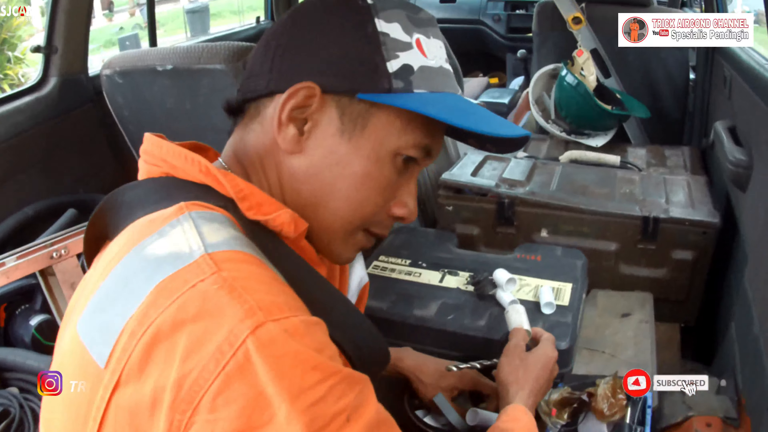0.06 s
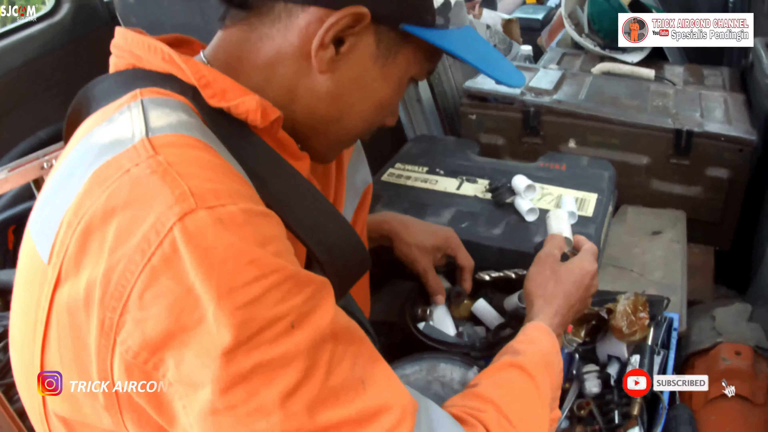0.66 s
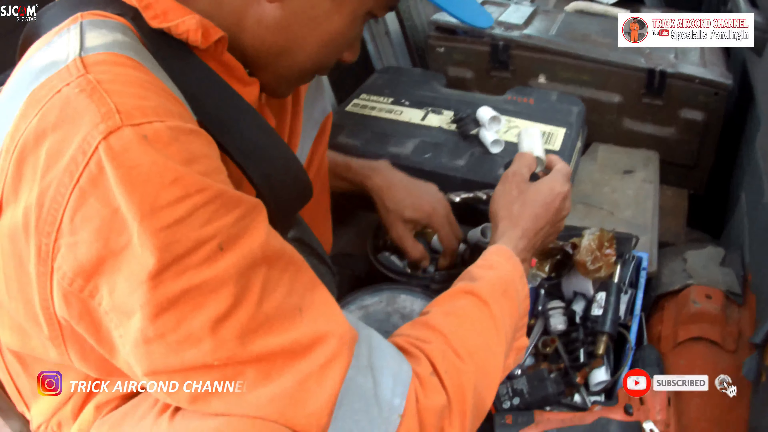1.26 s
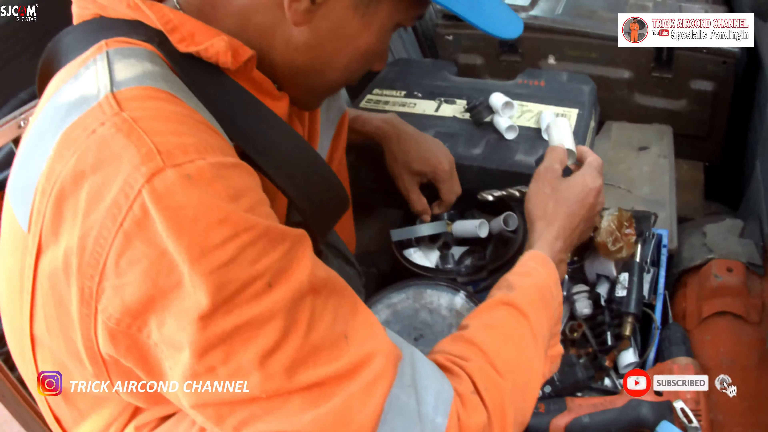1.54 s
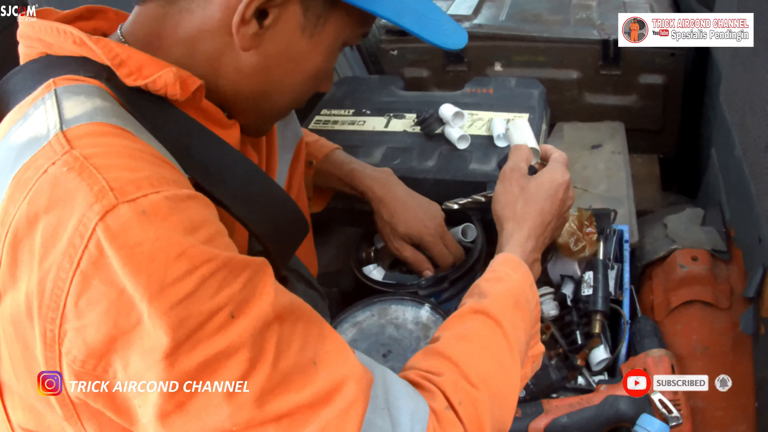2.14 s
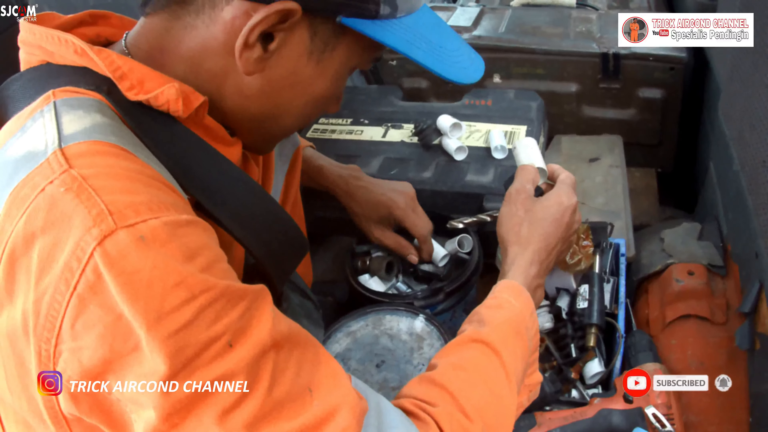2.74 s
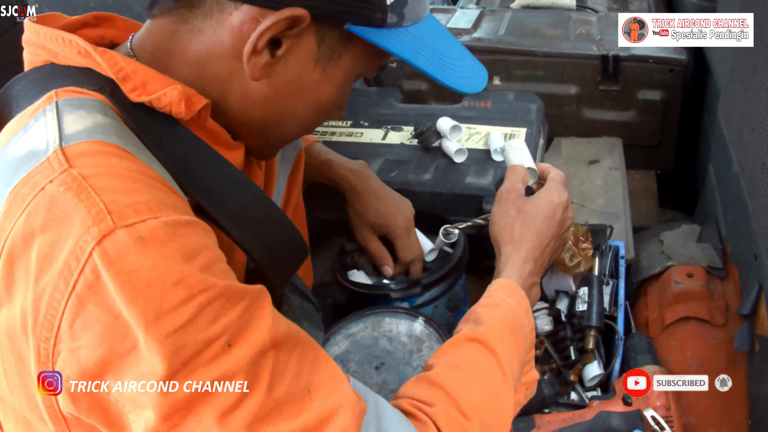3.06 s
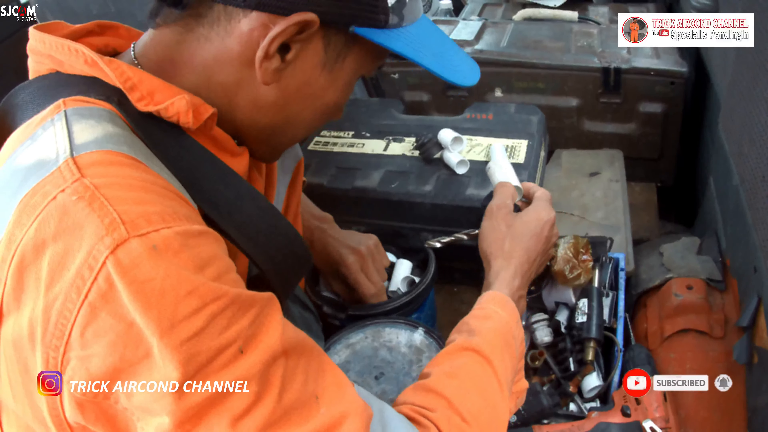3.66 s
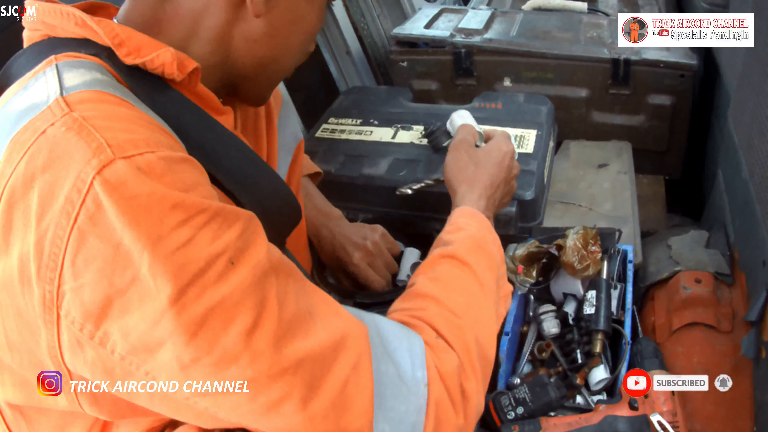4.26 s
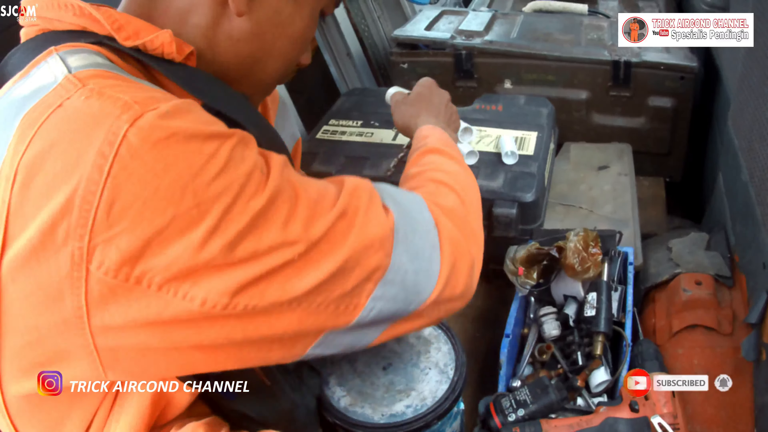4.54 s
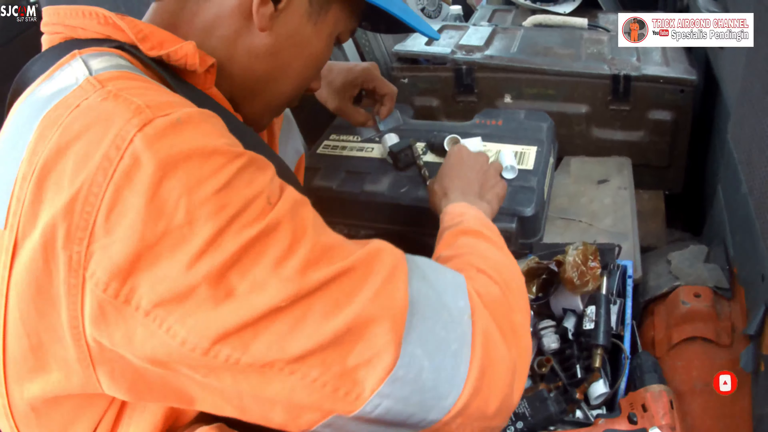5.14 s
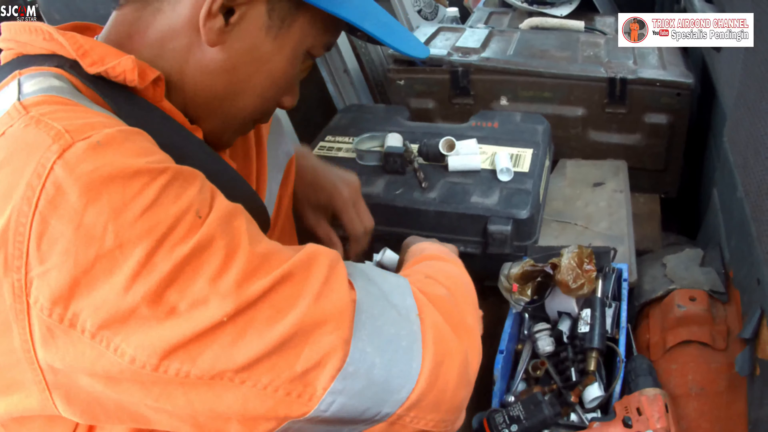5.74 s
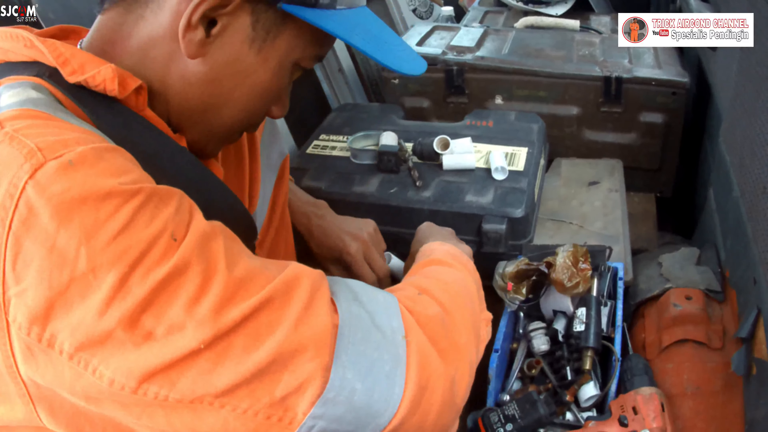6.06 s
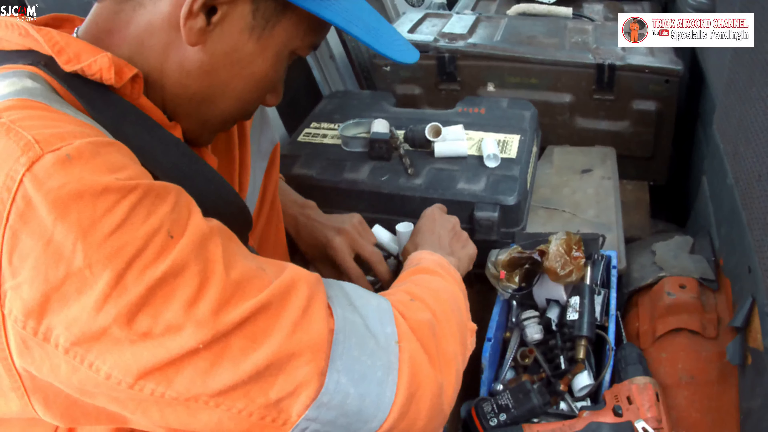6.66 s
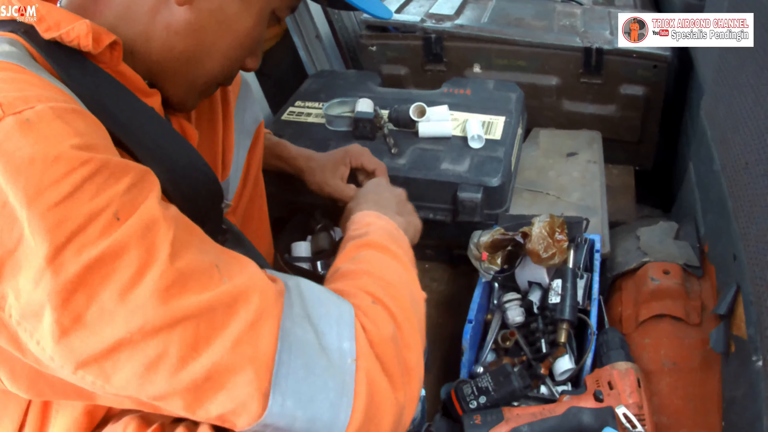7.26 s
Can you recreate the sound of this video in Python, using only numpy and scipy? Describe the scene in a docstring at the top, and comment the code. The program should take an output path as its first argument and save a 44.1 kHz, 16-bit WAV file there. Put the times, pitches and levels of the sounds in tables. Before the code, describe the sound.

Inside a cramped van, a hand stirs a tub of small metal and plastic parts. They slide, clack and knock against the tub in uneven bursts, with faint clinks from a steel drill bit. Past the middle, a few parts land on a hollow plastic tool case with louder, booming knocks, then lighter rummaging resumes. A steady low rumble runs underneath, and everything is heard from close by.

```python
"""Rummaging for spare parts in a van

A hand stirs a tub of small metal and plastic parts in the back of a van, over a steady low rumble.
Parts slide, clack and knock on the tub, and a steel drill bit clinks among them. Midway a few are
put down on a hollow plastic tool case, which booms. The cramped cab answers briefly."""
import sys
import numpy as np
from scipy import signal
from scipy.fft import rfft, irfft, next_fast_len
from scipy.io import wavfile

SR = 44100
rng = np.random.default_rng(int(sys.argv[2]) if len(sys.argv) > 2 else 0)


def inscribe(sig):
    """Save sig as 16-bit PCM at rate SR to the path in sys.argv[1].

    A 1-D sig is mono; a 2-D sig holds one channel per row.
    Samples are clipped to [-1, 1] before scaling.
    """
    pcm = np.round(np.clip(np.atleast_2d(sig).T, -1, 1) * 32767)
    wavfile.write(sys.argv[1], SR, pcm.astype(np.int16))


N = 326781
AGE = np.arange(12288) / SR  # seconds since a hit
HZ = np.fft.rfftfreq(len(AGE), 1 / SR)

# Sweeps of the hand. Each row: start and end in seconds, effort as the rubbing level in dB.
HAND_STROKES = [(0.29, 0.629, -35), (0.994, 1.059, -32.5), (1.153, 1.246, -35.5), (1.221, 1.354, -30.5),
                (1.42, 1.68, -36.5), (2.206, 2.443, -30), (2.896, 3.072, -37), (3.139, 3.537, -42.5),
                (3.747, 4.242, -42.5), (4.267, 4.549, -39), (5.434, 5.811, -46), (6.035, 6.407, -48),
                (6.558, 6.76, -42.5)]
# The tub's dull knock. Each row: resonance in Hz, width in Hz, relative level in dB.
TUB_MODES = [(154.7, 21, -0.5), (209.5, 45, -4), (349.2, 51.7, 2), (689, 112, -7), (1014, 169, -11)]
# A hollow plastic fitting. Each row: resonance in Hz, width in Hz, relative level in dB.
FITTING_MODES = [(1217, 86, -5), (1560, 91, 0), (1804, 600, -12.5)]


def rummaging():
    """The foreground clatter of parts striking each other in the tub."""
    # Each row: start in seconds, strength in dB, clack pitch in Hz, hardness (treble share) in dB.
    collisions = [(0.003, -27.5, 2400, -21.5), (0.06, -30.5, 2400, -8.5), (0.331, -28, 4240, -15.5),
                  (0.427, -45.5, 4140, 0), (0.582, -35, 3260, -18.5), (0.618, -31.5, 3100.0, -12.5),
                  (0.719, -37.5, 3050, -9.5), (0.765, -35, 3850.0, -13.5), (1.006, -29, 2340.0, -11.5),
                  (1.075, -34, 3380, -16.5), (1.24, -21.5, 4320, -10), (1.253, -22.5, 3140.0, -10),
                  (1.293, -23.5, 2500, -11.5), (1.347, -29.5, 2940, -8.5), (1.4, -27, 3850, -9.5),
                  (1.433, -32.5, 3640, -3), (1.584, -24.5, 4270, -10.5), (1.656, -32.5, 3140, -7.5),
                  (1.727, -30.5, 2790, -13), (2.065, -27.5, 2560, -15.5), (2.129, -35, 2200, -24),
                  (2.208, -28, 3130, -15.5), (2.252, -33, 3000, -8), (2.286, -28, 3020, -9.5),
                  (2.429, -31.5, 2230, -20), (2.587, -39, 2520, -2.5), (2.703, -27.5, 2590, -9),
                  (2.954, -50, 3050.0, -20), (3.298, -39.5, 3090.0, -16.5), (3.359, -34.5, 2230, -13),
                  (3.384, -24.5, 3100.0, -12), (3.758, -39.5, 2900, -13.5), (4.146, -30.5, 2600, -12),
                  (4.291, -34.5, 3020, -19.5), (4.336, -27, 2260.0, -22), (4.378, -30.5, 3100, -5),
                  (4.48, -29.5, 2590, -17), (4.523, -34.5, 2670.0, -4), (5.63, -34, 2280.0, -24.5),
                  (5.748, -47.5, 2560.0, -44), (5.885, -36, 3580, -12), (5.905, -36, 4300, -4.5),
                  (6.116, -34.5, 3620.0, -26), (6.212, -52, 3030, 2.5), (6.271, -34, 2760, -15.5),
                  (6.348, -33, 2960, -17), (6.36, -34.5, 3000, -9), (6.682, -24, 2420, -18),
                  (6.727, -41.5, 2670, -7), (6.88, -39, 2500, -10.5), (7.16, -34.5, 2630, -3.5)]
    return contacts(collisions)


def contacts(rows):
    """Parts clack and rebound once; hollow ones ring lower, and the heap passes each blow to the tub."""
    # The mix of a contact. Each voice: offset in dB, dB gained per dB of extra hardness.
    balance = {"tub": (-0.58, -0.37), "hollow": (-7, 0.28), "clack": (-13, 1), "tick": (-18, 1.23)}
    # The hand meets steel at first, then mostly plastic.
    # Each row: time in seconds, tilt from plastic clack toward metal tick in dB.
    metal_tilt = [(0.05, -1.5), (0.35, 11), (1.0, 10.5), (1.75, -2), (2.55, 14.5), (2.7, -3.5), (7.4, -1)]
    attack = 1 - np.exp(-AGE / 0.00047)  # softens the first half millisecond of each hit
    impulse = AGE == 0  # the part's weight, landing at once
    half = len(AGE) // 2
    out = np.zeros(N)
    for s, strength_db, clack_hz, hardness_db in rows:
        gain = voice_gains(balance, strength_db, hardness_db)
        metal = amp(np.interp(s, *np.transpose(metal_tilt)) / 2)
        force = attack * chatter(t60=0.094, cab_db=-16.5, cab_t60=0.48)
        size = np.exp(0.14 * rng.standard_normal())
        tub = body(force + 3.3 * impulse, TUB_MODES, low_hz=118, high_hz=1330)
        fitting = body(force + 6.9 * impulse, FITTING_MODES, low_hz=815, high_hz=2340, size=size)
        hit = gain["tub"] * tub + gain["hollow"] * fitting
        hit += gain["clack"] / metal * attack * clack(clack_hz)
        hit[:half] += gain["tick"] * metal * attack[:half] * tick(mode_count=10)
        add(out, s, hit)
        rebound_s = s + 0.012 + 0.025 * rng.random()
        add(out, rebound_s, amp(-23.5) * hit)
    return out


def clack(hz):
    """A short hard part: a main mode and a weaker, higher one, over a dry crack."""
    force = chatter(t60=0.099, cab_db=-16, cab_t60=0.096) + 6.7 * (AGE == 0)
    overtone_hz = hz * rng.uniform(1.0, 1.5)
    ring = body(force, [(hz, 130, 0), (overtone_hz, 300, -12)], low_hz=1700, high_hz=5600)
    crack_force = chatter(t60=0.059, cab_db=-2, cab_t60=0.19)
    crack = body(crack_force, [(2520, 960, 0)], low_hz=1680, high_hz=5200)
    return unit_hit(ring + amp(-3.5) * crack)


def tick(mode_count):
    """Each small metal part has its own high modes, which ring over the crack of contact."""
    t = AGE[:len(AGE) // 2]
    detune = 1 + 0.04 * rng.standard_normal((mode_count, 1))
    hz = np.geomspace(4900, 14000, mode_count)[:, None] * detune
    strength, life = rng.standard_normal((2, mode_count, 1))
    t60 = 0.06 * np.exp(0.3 * life)
    ring = np.sum(amp(5 * strength - 60 * t / t60) * np.sin(2 * np.pi * hz * t), axis=0)
    force = chatter(t60=0.072, cab_db=-8, cab_t60=0.33)[:len(t)]
    crack = band(force, 2800, 11400, order=2)
    return unit_hit(unit_hit(crack) + amp(2) * unit_hit(ring))


def tool_case():
    """Parts land on the case: a sharp crack, the rattle of the lid and the boom of the hollow under it."""
    # Each row: start in seconds, strength in dB, hardness (treble share) in dB.
    knocks = [(4.595, -13, -16.5), (4.649, -20.5, -22), (4.673, -13.5, -16.5), (4.712, -9.5, -13),
              (4.79, -19.5, -14.5), (4.863, -30.5, -13.5), (4.901, -27, -19.5), (5.014, -16.5, -39),
              (5.321, -17.5, -8), (5.377, -19, -12), (5.396, -25, -10.5), (5.416, -20, -13)]
    # The mix of a knock. Each voice: offset in dB, dB gained per dB of extra hardness.
    balance = {"boom": (-1.05, -0.15), "lid": (-3, 0.41), "crack": (-20, 1.76), "snap": (-29, 2)}
    # The hollow and its lid. Each row: resonance in Hz, width in Hz, relative level in dB.
    cavity_modes = [(163, 115, -16.5), (192, 58, 10.5), (285, 50, 7), (345, 43, -0.5)]
    lid_modes = [(520, 240, 0.5), (726, 88, 6), (853, 67, 4), (1230, 150, -1.5), (1510, 270, -2.5),
                 (1730, 500, -5)]
    out = np.zeros(N)
    for s, strength_db, hardness_db in knocks:
        gain = voice_gains(balance, strength_db, hardness_db)
        push = chatter(t60=0.11, cab_db=0.5, cab_t60=0.3)
        push[0] += 40  # the weight of the part lands all at once
        add(out, s, gain["boom"] * body(push, cavity_modes, low_hz=100, high_hz=510))
        rattle = chatter(t60=0.092, cab_db=-26, cab_t60=0.8)
        add(out, s, gain["lid"] * body(rattle, lid_modes, low_hz=374, high_hz=2330))
        crack = chatter(t60=0.095, cab_db=-9, cab_t60=0.087)
        add(out, s, gain["crack"] * unit_hit(band(crack, 1300, 3760, order=2)))
        add(out, s, gain["snap"] * tick(mode_count=12))
    return out


def drill_bit():
    """The long bit clinks when nudged; the parts around it damp its ring."""
    # Each row: start in seconds, strength in dB.
    clinks = [(0.33, -34.5), (0.3448, -34), (1.6516, -43), (2.293, -36), (2.65, -46.5), (2.758, -46.5),
              (3.481, -43), (4.5276, -44), (7.0748, -45), (7.1626, -59)]
    # The bit's ring. Each row: pitch in Hz, relative level in dB.
    bit_modes = [(4840, -12), (5950, -6), (7090, -13), (8370, -4), (9825, -6), (11350, 0), (12755, -5),
                 (13260, -10), (14320, -6)]
    out = np.zeros(N)
    for s, strength_db in clinks:
        add(out, s, amp(strength_db - 8) * steel_ring(bit_modes, decay_cycles=1400))
        add(out, s, amp(strength_db - 6) * tick(mode_count=9))
    return out


def steel_ring(modes, decay_cycles):
    """Struck steel: each mode is a beating pair that falls 60 dB in the same number of cycles."""
    hz, level_db = np.transpose(modes)[:, :, None]
    reach = np.cos(rng.uniform(0, np.pi * 2 / 5, hz.shape))  # the point of impact favours some modes
    beat = np.cos(2 * np.pi * rng.uniform(1.6, 50, hz.shape) * AGE)
    envelope = reach * beat * amp(level_db - 60 * AGE * hz / decay_cycles)
    ring = np.sum(envelope * np.sin(2 * np.pi * (hz * AGE + rng.random(hz.shape))), axis=0)
    attack = 1 - np.exp(-AGE / 0.007)
    return unit_hit(ring * attack)


def stirring():
    """Parts rub along the tub and fittings rattle; at the height of a firm stroke they scrape and ring."""
    # The tone of the grit. Each row: frequency in Hz, relative level in dB.
    grit_spectrum = [(400, 26), (2400, 21.5), (4800, 17.5), (6500, -8), (9000, 19.5), (15000, 0)]
    firm_db, grit_growth = -29.5, 3.2  # a firm stroke's effort; dB of scrape per dB of effort
    rub = unit(filtered(slips(per_s=180, spread_db=-4.5), lambda hz: resonances(TUB_MODES, hz)))
    fittings = filtered(slips(per_s=100, spread_db=20), lambda hz: resonances(FITTING_MODES, hz))
    rattle = amp(-10.5) * unit(band(fittings, 680, 2540))
    grit = unit(filtered(slips(per_s=600, spread_db=4), lambda hz: colour(grit_spectrum, hz)))
    out = np.zeros(N)
    for start, end, effort_db in HAND_STROKES:
        span = slice(round(start * SR), round(end * SR))
        pitches = np.geomspace(2300, 13000, 18) * rng.uniform(0.94, 1.06, 18)
        part_modes = [(hz, 55, 0) for hz in pitches]
        ring = unit(filtered(grit[span], lambda hz: resonances(part_modes, hz)))
        swell = signal.windows.hann(len(ring)) ** 1.34
        scrape = amp(-38 + grit_growth * (effort_db - firm_db)) * swell * (grit[span] + ring)
        stroke = amp(effort_db) * (rub[span] + rattle[span]) + scrape
        add(out, start, signal.windows.tukey(len(stroke), 0.2) * stroke)
    return out


def slips(per_s, spread_db):
    """Friction: tiny slips at random times, each a noise burst of a few milliseconds."""
    kicks = (rng.random(N) < per_s / SR) * amp(spread_db * rng.random(N))
    envelope = signal.lfilter([1], [1, -np.exp(-1 / (0.0038 * SR))], kicks)
    return envelope * rng.standard_normal(N)


def light_touches():
    """The longer strokes jostle a few parts lightly, at uneven moments."""
    touches_per_s, strength_db, hardness_db, clack_hz = 6.5, -43, -13.5, 3100
    rows = []
    for start, end, _ in HAND_STROKES:
        count = int((end - start) * touches_per_s)
        for k, (jitter, softness, pitch) in enumerate(rng.uniform(-1, 1, (count, 3))):
            s = start + (end - start) * (k + (1 + jitter) / 2) / count
            rows.append((s, strength_db - 3 * softness, clack_hz * np.exp(0.28 * pitch), hardness_db))
    return contacts(rows)


def steel_part():
    """A small steel part sings faintly after the first blow on the case, until other parts damp it."""
    # Each row: pitch in Hz, starting level in dB.
    modes = [(4393, -49.5), (11000, -60)]
    start_s, free_t60 = 4.6, 0.7
    ring = sum(amp(db - 60 * AGE / free_t60) * np.sin(2 * np.pi * hz * AGE) for hz, db in modes)
    damping = np.cos(np.pi / 2 * AGE / AGE[-1])
    out = np.zeros(N)
    add(out, start_s, ring * damping)
    return out


def cab_rumble():
    """A low rumble booms in the cab, under faint outdoor noise and hiss."""
    # The rumble's slow drift. Each row: time in seconds, deep band level in dB, upper band level in dB.
    drift = [(0, -29, -33.5), (4.6, -33.5, -29.5), (7.4, -37.5, -33.5)]
    # The outdoor air. Each row: frequency in Hz, relative level in dB.
    air_spectrum = [(20, -51), (110, 7), (340, -5), (470, -10), (750, -12), (1500, -20.5), (2200, -27.5),
                    (6000, -35), (15000, -36.5)]
    s, deep_db, upper_db = np.transpose(drift)
    t = np.arange(N) / SR
    deep = amp(np.interp(t, s, deep_db)) * unit(band(rng.standard_normal(N), 26, 56.8, order=4))
    upper = amp(np.interp(t, s, upper_db)) * unit(band(rng.standard_normal(N), 48.2, 77.6))
    air = unit(filtered(rng.standard_normal(N), lambda hz: colour(air_spectrum, hz)))
    return deep + upper + amp(-41) * air


def chatter(t60, cab_db, cab_t60):
    """One contact's noisy force and the cab's dense reflections; each falls 60 dB in its t60 seconds."""
    return rng.standard_normal(len(AGE)) * (amp(-60 * AGE / t60) + amp(cab_db - 60 * AGE / cab_t60))


def body(force, modes, low_hz, high_hz, size=1):
    """A plastic shell answers a force within its band; a bigger one sounds lower."""
    s = 1j * (HZ + 1)
    off_band = (s * s + low_hz * high_hz) / (s * (high_hz - low_hz))
    band_pass = 1 / (off_band ** 2 + np.sqrt(2) * off_band + 1)
    return unit_hit(irfft(rfft(force) * resonances(modes, HZ * size) * band_pass))


def resonances(modes, hz):
    """Response of a body with broad modes of alternating sign."""
    return sum((-1) ** k * amp(db) * 1j * hz * width / (centre ** 2 - hz ** 2 + 1j * hz * width)
               for k, (centre, width, db) in enumerate(modes))


def voice_gains(balance, strength_db, hardness_db, usual_hardness_db=-11):
    """Harder hits favour the high voices, softer ones the low."""
    extra_db = hardness_db - usual_hardness_db
    return {name: amp(strength_db + db + slope * extra_db) for name, (db, slope) in balance.items()}


def amp(db):
    """Decibels to gain."""
    return np.exp(np.asarray(db) * (np.log(10) / 20))


def unit(x):
    """Scale to rms 1."""
    return x / np.sqrt(np.mean(x ** 2) + 1e-20)


def unit_hit(x):
    """Scale a hit to rms 1 over its first 20 ms."""
    return x / np.sqrt(np.mean(x[:SR // 50] ** 2) + 1e-20)


def colour(points, hz):
    """An EQ curve through (Hz, dB) points on a log axis."""
    f, db = np.transpose(points)
    return amp(np.interp(np.log(hz + 1), np.log(f), db))


def filtered(x, response):
    """Shape x with a frequency response."""
    m = next_fast_len(len(x) + len(AGE))
    return irfft(rfft(x, m) * response(np.fft.rfftfreq(m, 1 / SR)), m)[:len(x)]


def band(x, low_hz, high_hz, order=3):
    """Causal band-pass."""
    return signal.sosfilt(signal.butter(order, [low_hz, high_hz], "band", fs=SR, output="sos"), x)


def add(track, s, sound):
    """Mix a sound into the track at s seconds."""
    start = max(round(s * SR), 0)
    track[start:start + len(sound)] += sound[:N - start]


def scene():
    """Hits, friction and rumble in mono, heard from just behind the shoulder."""
    struck = rummaging() + tool_case() + drill_bit() + steel_part()
    return (struck + cab_rumble() + stirring() + light_touches())[None]


def record(dry):
    """Clip at full scale and cut everything above 15.5 kHz."""
    return filtered(np.clip(dry[0], -1, 1), lambda hz: hz < 15500)[None]


dry = scene()
out = record(dry)
inscribe(out)
```